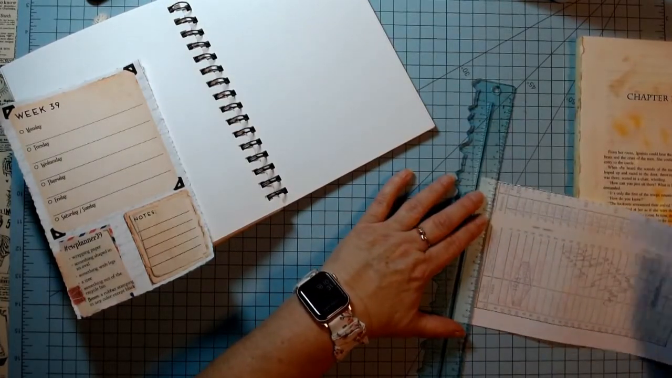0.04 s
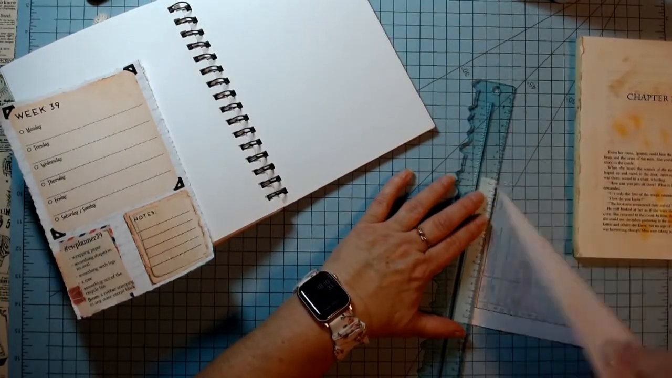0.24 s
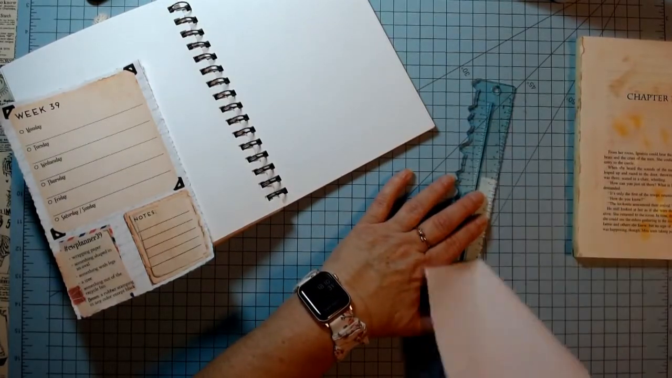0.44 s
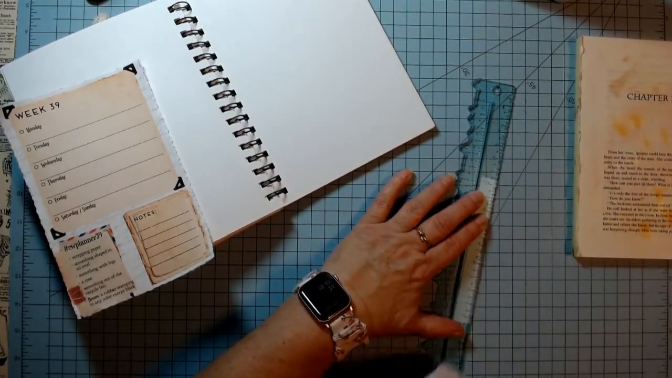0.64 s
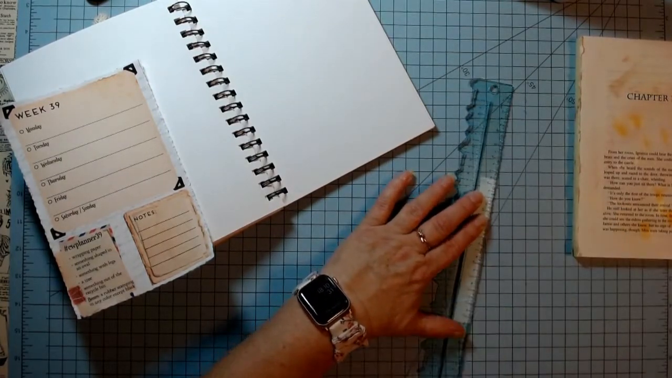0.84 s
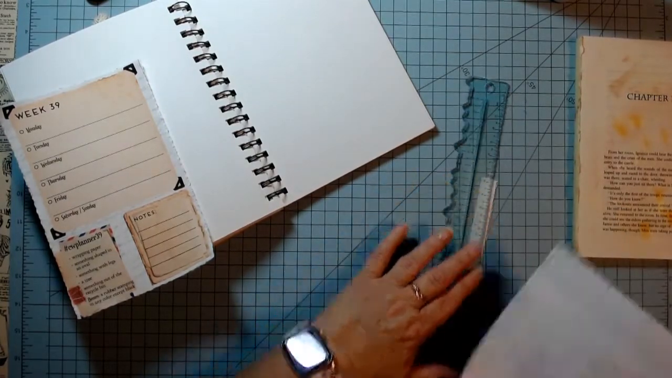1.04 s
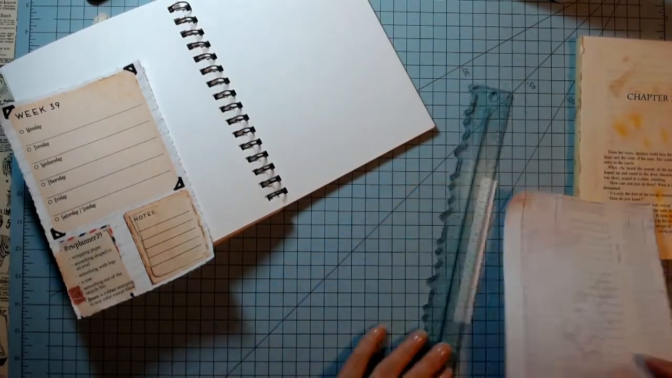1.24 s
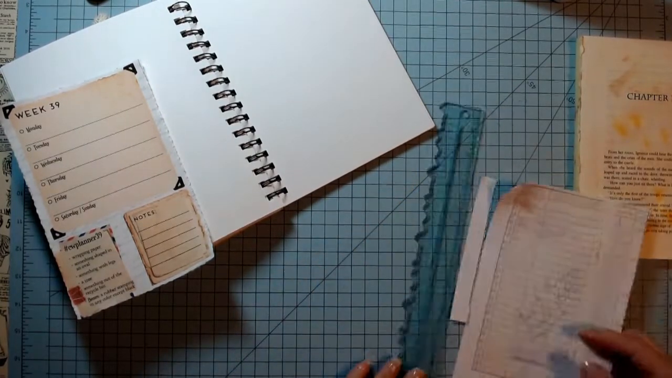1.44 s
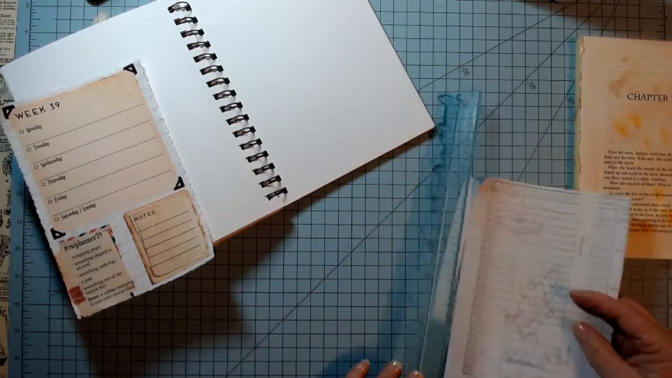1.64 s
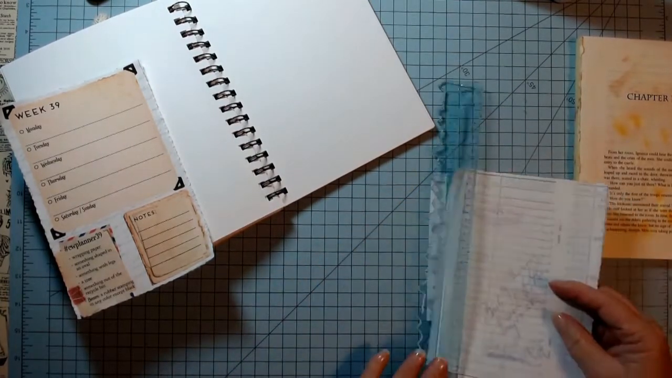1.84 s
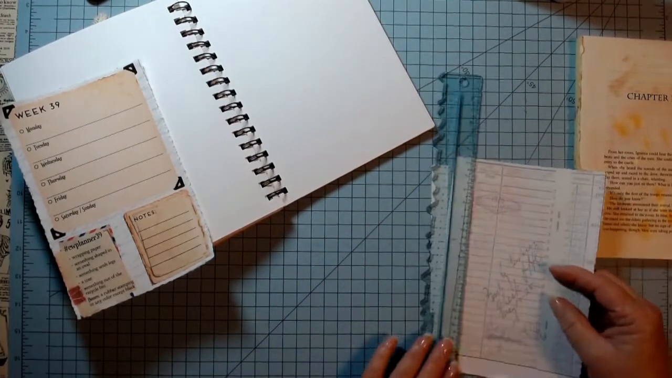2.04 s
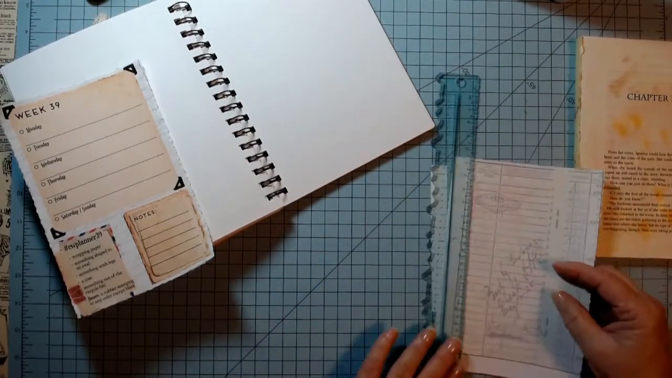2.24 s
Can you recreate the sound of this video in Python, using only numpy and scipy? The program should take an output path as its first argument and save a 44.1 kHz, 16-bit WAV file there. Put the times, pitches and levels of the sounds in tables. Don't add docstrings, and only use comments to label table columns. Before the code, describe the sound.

Close stereo pickup at a craft table: a brief fold crunch, a loud two-surge paper rip, papery flutter, faint sliding strokes, then a ruler dropping with a hard bouncing clack over faint hiss and low hum.

```python
import sys
import numpy as np
from scipy import signal
from scipy.fft import rfft, irfft
from scipy.io import wavfile
from scipy.ndimage import uniform_filter1d

SR = 44100
rng = np.random.default_rng(int(sys.argv[2]) if len(sys.argv) > 2 else 0)


def store_wav(level_fs):
    pcm = np.round(np.clip(np.atleast_2d(level_fs), -1, 1) * 32767)
    wavfile.write(sys.argv[1], SR, pcm.T.astype(np.int16))


def ratio_of_db(decibels):
    return 10 ** (np.asarray(decibels, float) / 20)


N = 101430

# frequency in Hz, level in dB.
TORN_EDGE_COLOUR = [(200, -12), (500, -7), (1000, -3.5), (2800, -4), (6000, -6.5), (8000, -15.5),
                    (14000, -26), (16500, -25.5)]


def evened(x):
    return x / np.sqrt(np.mean(x ** 2) + 1e-20)


def read(points, hz):
    f, value = np.transpose(points)
    return np.interp(np.log(hz + 1), np.log(f + 1), value)


def add(mix, s, sound):
    part = mix[..., round(s * SR):][..., :sound.shape[-1]]
    part += sound[..., :part.shape[-1]]


def high_pass(x, order, hz):
    return signal.sosfilt(signal.butter(order, hz, "high", fs=SR, output="sos"), x)


def colour(x, points):
    hz = abs(np.fft.fftfreq(4096, 1 / SR))
    floor = (14, points[0][1] - 24)
    log = np.log(ratio_of_db(read([floor] + list(points), hz)))
    taps = np.fft.ifft(np.exp(log - 1j * signal.hilbert(log).imag)).real[:2048]
    return signal.oaconvolve(x, taps[None], axes=1)[:, :x.shape[1]]


def resonate(x, hz, width_hz):
    turn = np.exp(2j * np.pi * np.cumsum(hz * np.ones(x.shape[-1])) / SR)
    r = np.exp(-np.pi * width_hz / SR)
    return 2 * (turn * signal.lfilter([1 - r], [1, -r], x / turn)).real


def ring(hz, t60, size=3000):
    t = np.arange(size) / SR
    return np.sin(2 * np.pi * hz * t) * ratio_of_db(-60 * t / t60)


def hiss():
    # frequency in Hz, level in dB.
    hiss_colour = [(70, -3.5), (150, -4), (400, -11.5), (2600, -28.5), (5000, -30), (8000, -36),
                   (16000, -54)]
    # frequency in Hz, left-right likeness from 0 to 1.
    likeness = [(60, 0.58), (600, .56), (3000, .01)]
    hz = np.fft.rfftfreq(N, 1 / SR)
    a, b = rfft(rng.standard_normal((2, N)))
    same = np.clip(read(likeness, hz), -1, 1)
    pair = np.array([a, same * a + np.sqrt(1 - same ** 2) * b])
    level = ratio_of_db(read([(15, -8), (50, -7.0)] + list(hiss_colour), hz))
    return ratio_of_db(-69) * evened(irfft(pair * level, N))


def hum():
    hum_hz, width_hz, steady = 41.5, 7, 1.8
    hz = np.fft.rfftfreq(N, 1 / SR)
    common, side = rfft(rng.standard_normal((2, N)))
    band = np.exp(-((hz - hum_hz) / width_hz) ** 2)
    waver = evened(irfft([common + 0.14 * side, common - 0.29 * side] * band, N))
    tone = steady * np.sin(2 * np.pi * hum_hz * np.arange(N) / SR)
    return ratio_of_db(-58.5) * evened(waver + tone)


def insect():
    pitch_hz, strokes_per_s = 7460, 23
    hz = np.fft.rfftfreq(N, 1 / SR)
    throb = np.maximum(np.sin(2 * np.pi * strokes_per_s * np.arange(N) / SR + 1.5), 0) ** 2
    band = np.exp(-((hz - pitch_hz) / 350) ** 2)
    return ratio_of_db(-92.5) * evened(throb * irfft(rfft(rng.standard_normal(N)) * band, N))


def room(x):
    # frequency in Hz, t60 in seconds.
    decay = [(150, 0.14), (1500, 0.15), (12000, 0.14)]
    thin_hz = 700
    taps = np.zeros((2, SR // 2))
    at = np.arange(60, SR // 2 - 20, 20) + rng.integers(0, 20, (2, (SR // 2 - 61) // 20))
    np.put_along_axis(taps, at, rng.choice([-1., 1.], at.shape), 1)
    hz, t, z = signal.stft(taps, SR, nperseg=256)
    z[:] = z + z[::-1] * np.clip(.6 - hz / 1100, 0, 1)[:, None]
    thin = np.clip(hz / thin_hz, .2, 1)[:, None]
    die = ratio_of_db(-60 * t / read(decay, hz)[:, None])
    tail = signal.istft(z * thin * die, SR, nperseg=256)[1]
    return signal.fftconvolve(x[None], tail / np.linalg.norm(tail[0]), axes=1)[:, :N]


def ruler():
    # start in seconds, peak in dB, pitch most stirred in Hz.
    blows = [
        (2.0004, -21, 2950),
        (2.0043, -18.5, 597),
        (2.0075, -16, 2750),
        (2.014, -28, 1400),
        (2.021, -25.5, 192),
        (2.022, -32.5, 800),
        (2.031, -27, 370),
        (2.0455, -27, 2000),
        (2.053, -31, 1400),
        (2.064, -36, 702),
    ]
    # frequency in Hz, level in dB, t60 in seconds.
    modes = [(192.2, -10, 0.14), (239, -6, 0.13), (367, -0.5, 0.025), (800, 2.5, 0.015),
             (1400, -1.5, 0.021), (2000, 0, 0.015), (2850, 0, 0.0082)]
    stir_db_per_octave = 9
    out = np.zeros(N)
    for s, db, struck_hz in blows:
        bends = rng.standard_normal(len(modes))
        clack = 0
        for (hz, mode_db, t60), bend in zip(modes, bends):
            stirred = ratio_of_db(mode_db - stir_db_per_octave * abs(np.log2(hz / struck_hz)))
            clack = clack + stirred * ring(hz * (1 + 0.037 * bend), t60, size=6000)
        add(out, s, -ratio_of_db(db) * clack)
    return out


def rub(start, length, db, hz):
    t = np.arange(0, length, 1 / SR)
    width_hz = 30 + 0.24 * hz
    grit = ratio_of_db(2.5 * evened(uniform_filter1d(rng.standard_normal(len(t)), size=80)))
    noise = grit * rng.standard_normal((3, len(t)))
    voice = resonate(resonate(noise, hz, width_hz), hz, width_hz)
    return start, ratio_of_db(db) * np.sin(np.pi * t / length) * evened(voice)


def rubs_and_tugs(top):
    # start in seconds, length in seconds, level in dB, pitch in Hz.
    rubs = [(1.13, 0.023, -87, 1010), (1.14, 0.15, -64.5, 220), (1.23, 0.0655, -66.5, 913),
            (1.24, 0.067, -66.5, 335.6), (1.272, 0.041, -53, 1820), (1.3, 0.085, -65, 760),
            (1.301, 0.1, -64.5, 412), (1.347, 0.075, -79, 3600), (1.372, 0.12, -78.5, 2320),
            (1.55, .08, -79, 1200), (1.585, 0.029, -60.5, 2110), (1.67, 0.06, -76.5, 501),
            (1.69, 0.087, -77.5, 810), (.9, 0.069, -65.5, 105.6), (2.1, 0.099, -69.5, 151)]
    # start in seconds, length in seconds, level in dB, pitch in Hz.
    tugs = [(.215, .04, -28, 2850), (.24, .045, -30.5, 1600), (.226, 0.061, -33.5, 315),
            (0.26, 0.045, -29, 3300), (0.34, .035, -27.5, 2100), (0.36, 0.031, -32.5, 1100),
            (.355, .035, -33.5, 3800), (.335, .04, -36, 290), (0.36, 0.019, -37.5, 1290),
            (.455, .045, -34, 1030), (0.55, 0.025, -38, 1063), (.54, 0.039, -40.5, 920),
            (.385, 0.055, -34.5, 140), (.495, 0.071, -38.5, 150), (0.23, .07, -53.5, 40),
            (0.35, .07, -51, 50), (0.12, .06, -56.5, 70)]
    for row in rubs + tugs:
        add(top, *rub(*row))


def paper(curve, tint, per_s, spread_db, clump_db, cycles, note_db, note_width_hz=800):
    # frequency in Hz, width in Hz, level in dB.
    table_modes = [(129.5, 39, -2.5), (199, 70, -3.5), (311.7, 60, -3)]
    s, effort_db, bright_db, pull_db, note_hz = np.transpose(curve)
    t = np.arange(s[0], s[-1], 1 / SR)
    slow = uniform_filter1d(uniform_filter1d(rng.standard_normal(len(t)), 200), 200)
    clump = ratio_of_db(clump_db * evened(slow))
    chance, size, kind, sign, place = rng.random((5, len(t)))
    breaks = clump * (chance < per_s / SR) * ratio_of_db(-spread_db * np.log(size + 0.026)) * np.sign(sign - .5)
    breaks = breaks * ((place * 3).astype(int) == np.arange(3)[:, None])

    grains = 0
    for k, hz in enumerate(np.geomspace(200, 16000, num=16)):
        grain = ring(hz, 3 * cycles / hz, size=1500)[None]
        grain = np.sqrt(hz) * grain / np.linalg.norm(grain)
        chosen = breaks * ((kind * 16).astype(int) == k)
        grains = grains + signal.oaconvolve(chosen, grain, axes=1)[:, :len(t)]

    sheet = colour(grains, tint)
    low = resonate(sheet, 580, 1600)
    tilt = np.interp(t, s, bright_db)
    sheet = low * ratio_of_db(-tilt) + (sheet - low) * ratio_of_db(tilt)
    note = resonate(sheet, np.interp(t, s, note_hz), note_width_hz)
    sheet = evened(sheet + ratio_of_db(note_db) * note) / np.sqrt(3)

    table = 0
    for hz, width_hz, db in table_modes:
        mode = resonate(resonate(breaks, hz, width_hz), hz, width_hz)
        table = table + ratio_of_db(db) * mode / np.sqrt(width_hz)
    table = evened(table) * np.array([[.3], [1], [.3]])

    fade = np.clip(np.minimum(t - s[0], s[-1] - t) / 0.0014, 0, 1)
    effort = fade * ratio_of_db(np.interp(t, s, effort_db))
    return s[0], effort * (sheet + ratio_of_db(np.interp(t, s, pull_db)) * table)


def stroke(start, rise, length, db, hz):
    # frequency in Hz, level in dB.
    slide_colour = [(200, -8.5), (500, -7.5), (1100, -3), (2500, -3.5), (6000, -8), (8000, -19.5),
                    (16500, -30)]
    dulled = start + rise + 0.56 * (length - rise)
    steps = [(start, -20, 1.5), (start + rise, 0, 1.5), (dulled, -6, .3), (start + length, -16, -1.5)]
    curve = [(s, db + d, bright_db, -26, hz) for s, d, bright_db in steps]
    s, drag = paper(curve, slide_colour, 12000, 3.1, 1.91, 1.5, 3.58, 600)
    return s, drag + ratio_of_db(-3.5) * resonate(drag, 2750, 150)


def slides(top):
    # start in seconds, rise in seconds, length in seconds, effort in dB, sheet note in Hz.
    strokes = [(0.007, 0.014, 0.093, -66.5, 3400), (.865, 0.094, 0.21, -51, 3550),
               (0.994, 0.018, 0.051, -47, 2960), (1.052, 0.015, 0.15, -59, 4420),
               (1.123, 0.017, 0.17, -50.5, 950), (1.271, 0.005, 0.089, -49, 1730),
               (1.497, 0.0704, 0.17, -57.5, 1985), (1.788, 0.0107, .1, -62, 4655),
               (1.9, 0.0079, 0.068, -61, 2750), (2.241, 0.00677, 0.062, -69.5, 4580)]
    for row in strokes:
        add(top, *stroke(*row))


def settle():
    # time in seconds, effort in dB, brightness in dB, pull on the table in dB, sheet note in Hz.
    curve = [
        (1.992, -53.5, -2, -14, 2775),
        (1.999, -34, 3, -9, 2930),
        (2.009, -29.5, 1, -18, 2700),
        (2.04, -48.5, -0.5, -32, 2000),
        (2.047, -33, 2, -13, 2000),
        (2.068, -48, 2.5, -5.5, 1400),
        (2.11, -65.5, 1.5, 6, 1170),
        (2.2, -95, 0.5, -3.5, 1120),
    ]
    # frequency in Hz, level in dB.
    tint = [(200, 0.5), (600, -6.5), (1400, -9.5), (2800, -11), (7000, -18.5), (8000, -27), (15000, -32.5),
            (16500, -36.5)]
    return paper(curve, tint, 9000, 3.8, 1.18, 2.7, -3.5)


def flap():
    # time in seconds, effort in dB, brightness in dB, pull on the table in dB, sheet note in Hz.
    curve = [(.704, -46, -1, -22, 800), (.716, -46, -6, -20, 760), (.724, -37, -7.5, -26, 705),
             (.745, -42, -2.1, -29, 700), (.82, -42.5, 0, -18.5, 844), (.855, -53, 1.5, -11, 594),
             (.878, -44, -2, -24, 630), (.91, -54, 4, -34, 900)]
    # frequency in Hz, level in dB.
    tint = [(300, -26.5), (450, -12), (750, -6.5), (2000, -7), (5000, -11.5), (8000, -20.5), (15000, -34.5),
            (16500, -27)]
    return paper(curve, tint, 8000, 2.0, 1.2, 1.6, 10.0)


def snaps():
    # start in seconds, peak in dB, pitch in Hz, length in cycles.
    pops = [(.127, -28.5, 424, 5.7), (.136, -23, 930, 8.7), (.146, -25, 496, 15), (.177, -33.5, 328, 8.1),
            (0.2122, -16.5, 2865, 8), (.237, -13.5, 2850, 8.6), (.258, -8, 1550, 4.7),
            (.331, -14, 815, 8.6), (.436, -10, 1400, 6), (.479, -11.5, 1050, 4.9), (.559, -19.5, 940, 8),
            (.707, -33, 800, 22), (.7165, -20, 726, 10.4), (.717, -32.5, 2800, 14), (.721, -24, 1180, 24),
            (.725, -27, 700, 14), (.728, -25, 2440, 9.6), (.734, -29.5, 900, 5.1), (.748, -33, 630, 17),
            (.754, -31, 820, 18), (.778, -34.5, 750, 4.6), (.788, -30, 990, 4.6), (.8, -38, 910, 5),
            (.816, -36, 767, 14), (.87, -34.5, 590, 14), (.884, -35.5, 800, 8), (1.281, -38, 1860, 9.1),
            (1.292, -35.5, 1460, 12)]
    out = np.zeros(N)
    for s, db, hz, cycles in pops:
        tick = rng.standard_normal(3000) * ratio_of_db(-60 * np.arange(3000) / SR / 0.0013)
        add(out, s, ratio_of_db(db) * (ratio_of_db(-21) * tick - ring(hz, cycles / hz)))
    return high_pass(out, 2, 330)


def crease():
    # time in seconds, effort in dB, brightness in dB, pull on the table in dB, sheet note in Hz.
    curve = [
        (.123, -53.5, -3.5, -16, 450),
        (.13, -39, -3, -18.5, 450),
        (.142, -29.5, 6.5, -16, 480),
        (.15, -33, 0.5, -15.5, 480),
        (.17, -46.5, 1, -10, 500),
        (.18, -41, -4, -8, 400),
        (.207, -56.5, -4, -10, 450),
    ]
    # frequency in Hz, level in dB.
    tint = [(200, -7), (500, -5.5), (1000, -11), (2500, -7.5), (5300, -15.5), (8000, -28.5), (16500, -36)]
    return paper(curve, tint, 7000, 0.67, 0.66, 1.6, 1.5)


def tear_off():
    # time in seconds, effort in dB, brightness in dB, pull on the table in dB, sheet note in Hz.
    curve = [
        (.575, -43, -3.5, -3, 970),
        (.63, -41.5, -6, -15, 1050),
        (.655, -59, -1.5, -15, 910),
        (.71, -62, -10, -15, 845),
    ]
    return paper(curve, TORN_EDGE_COLOUR, 10000, 1.2, 2.6, 0.85, 8.2)


def tear():
    # time in seconds, effort in dB, brightness in dB, pull on the table in dB, sheet note in Hz.
    curve = [
        (.208, -49.5, -3, -15, 2850),
        (.213, -21, -0.9, -9, 2922),
        (.245, -17, -2, -18, 2735),
        (.29, -22.5, -0.9, -15, 2214),
        (.33, -18.5, 0.44, -15.5, 3108),
        (.375, -26.5, -2.55, -11, 3008),
        (.41, -23, 1.5, -13.5, 1100),
        (.565, -27, 0.46, -17.5, 996.7),
        (.6, -47.5, -7, -9, 898),
    ]
    return paper(curve, TORN_EDGE_COLOUR, 9000, 3.4, 0.46, 2.0, 1.5, 1200)


def scene():
    # frequency in Hz, left minus right in dB.
    lean_points = [(60, 2.84), (400, 4), (1300, 2), (3500, -0.5)]
    place_lags = (2, 4, 7)
    top = np.array([[0], [1], [0]]) * (snaps() + ruler())
    for source in (settle, flap, crease, tear_off, tear):
        add(top, *source())
    slides(top)
    top = high_pass(top, 3, 93)
    rubs_and_tugs(top)

    lean = ratio_of_db(read(lean_points, np.fft.rfftfreq(N, 1 / SR)) / 2)
    left = sum(np.roll(part, lag) for part, lag in zip(top, place_lags))
    right = top.sum(0)
    near = irfft(rfft([left, right]) * [lean, 1 / lean], N)
    air = hiss() + hum() + insect()
    return ratio_of_db(-0.5) * near + ratio_of_db(-3.5) * room(right) + air


def roll_off(x):
    return signal.sosfilt(signal.butter(12, 16440, fs=SR, output="sos"), x)


def record(dry):
    return roll_off(dry)


dry = scene()
out = record(dry)
store_wav(out)
```